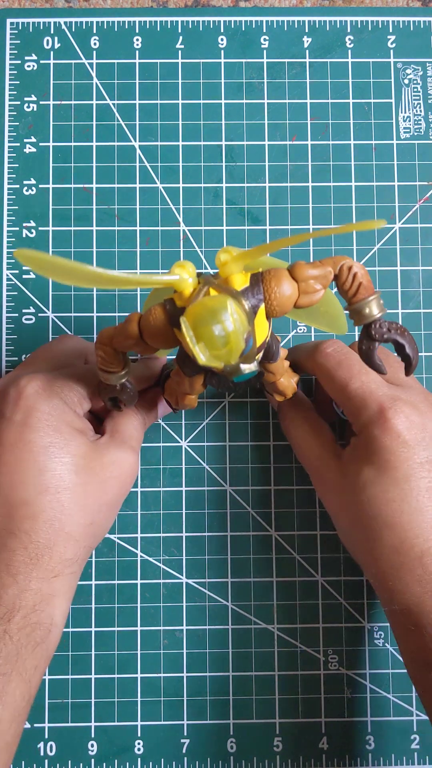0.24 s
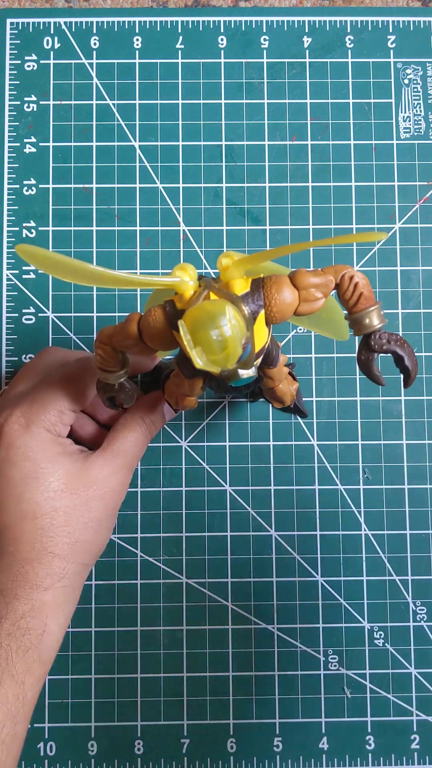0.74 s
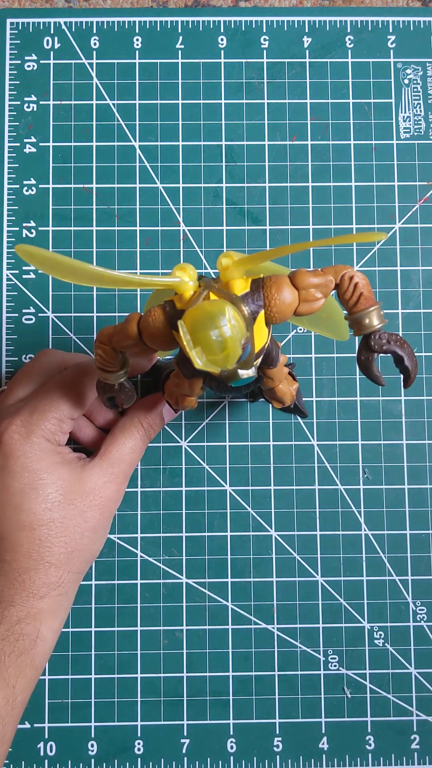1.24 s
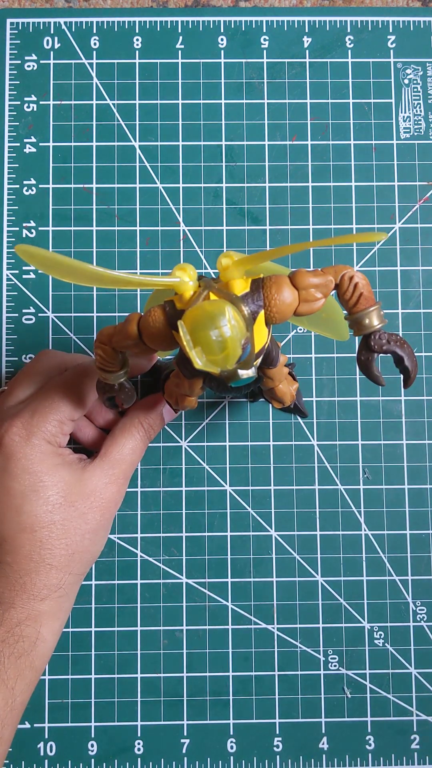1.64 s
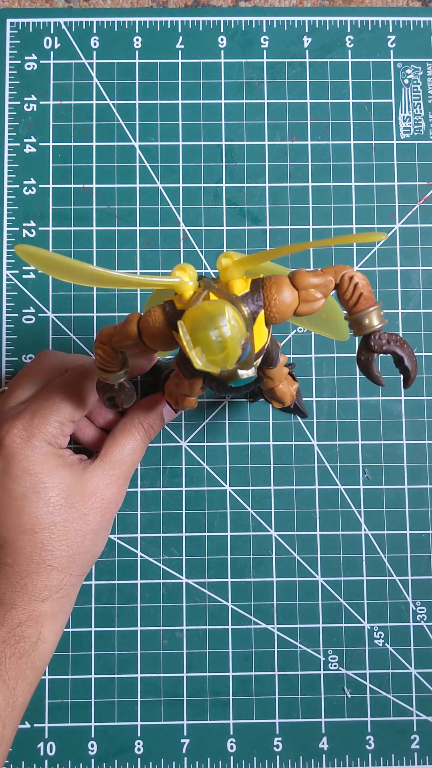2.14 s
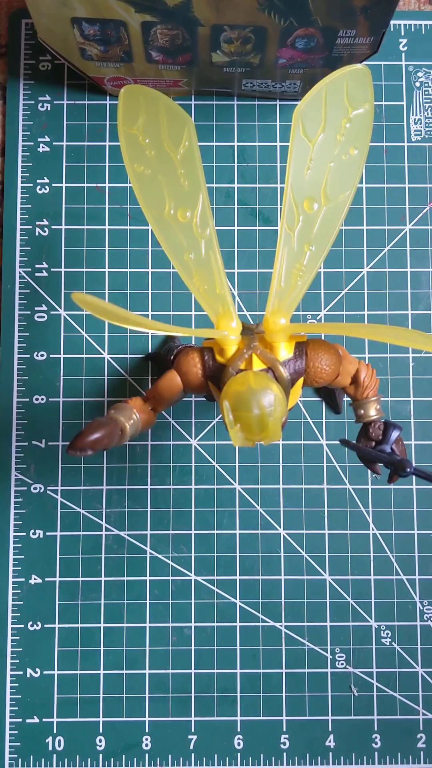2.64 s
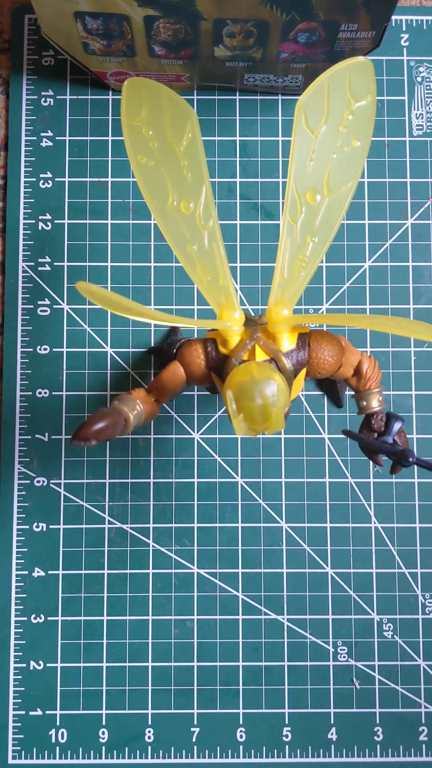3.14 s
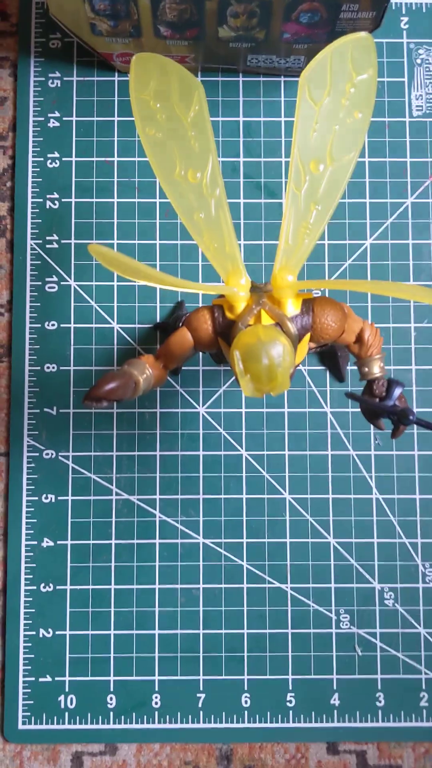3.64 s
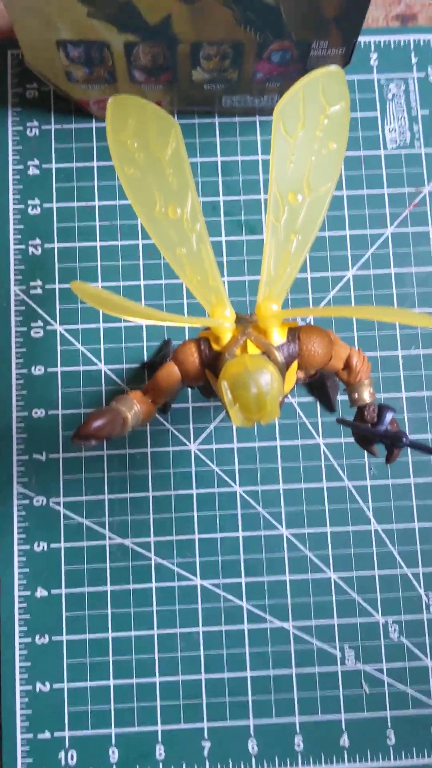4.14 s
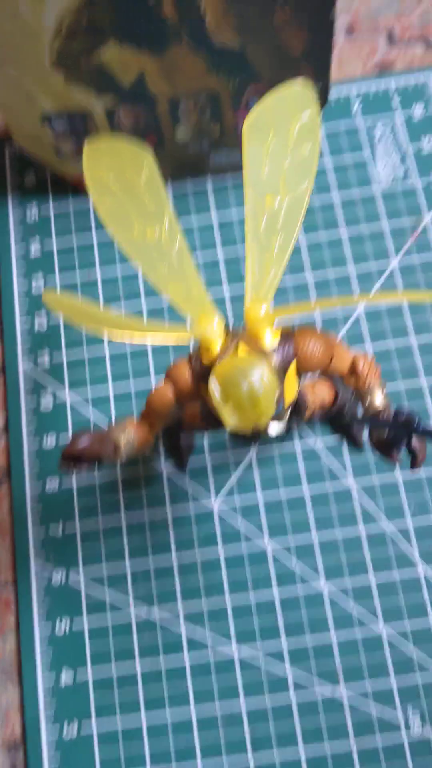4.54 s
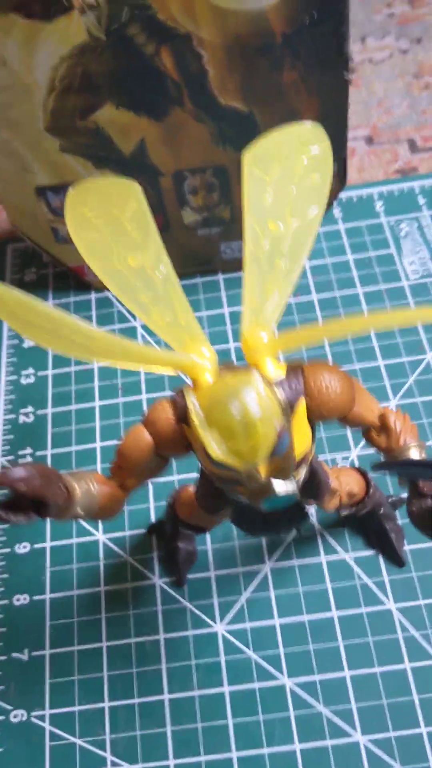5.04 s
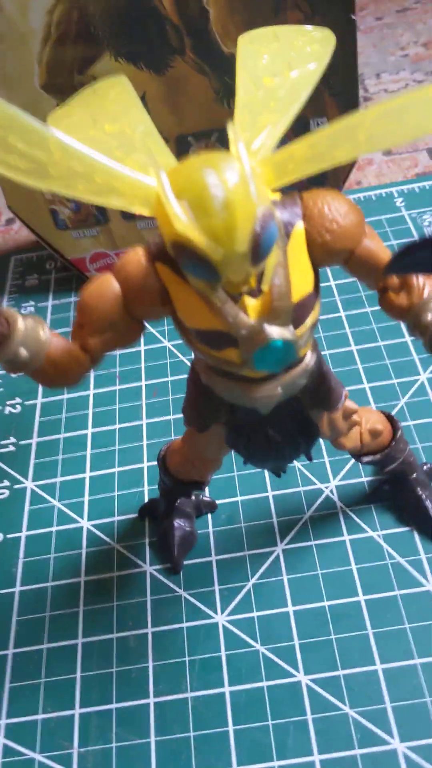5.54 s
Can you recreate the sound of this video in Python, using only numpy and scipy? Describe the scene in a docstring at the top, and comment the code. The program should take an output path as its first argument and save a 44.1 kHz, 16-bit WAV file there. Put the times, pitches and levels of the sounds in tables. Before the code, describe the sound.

In a small quiet room, a plastic figure is handled very close to a phone microphone. Faint joint ticks and soft rubbing come first, then a pause. Plastic creaks and clicks thicken into a short squeaky scrape that climbs in pitch and ends in a loud snap with a thin metallic ring. Only quiet room rumble and slight rubbing follow.

```python
"""A plastic spring clamp creaks, scrapes and snaps shut as a phone is worked out of it in a quiet room.
Each creak is one slip of the grip: a damped resonance plus a bright crack. Crowded slips make a rising scrape.
The snap is a noise burst with a ringing spring; pressure steps thump into the phone's left port.
Before and among the creaks, a plastic figure's joints tick faintly as short filtered clicks.
Skin rubs in grainy noise, a closing hand adds hollow noise, and room air rumbles and hums throughout."""
import sys
import numpy as np
from scipy import signal
from scipy.fft import rfft, irfft
from scipy.io import wavfile

SR = 44100
rng = np.random.default_rng(int(sys.argv[2]) if len(sys.argv) > 2 else 0)


def materialize(psi):
    """Save the field psi as 16-bit PCM at rate SR to the path in sys.argv[1].

    A 1-D psi becomes a single channel; in a 2-D psi each row is a channel.
    """
    bounded = np.clip(np.atleast_2d(psi).T, -1, 1)
    quanta = np.round(bounded * 32767).astype(np.int16)
    wavfile.write(sys.argv[1], SR, quanta)


N = 255324
TIME = np.arange(N) / SR
HIT_SIZE = 2048  # samples in one short hit
HIT_HZ = np.maximum(np.fft.rfftfreq(HIT_SIZE, 1 / SR), 1)
SNAP_S = 4.3518  # the jaws snap shut and the phone comes free


def undb(db):
    """Decibels to gain."""
    return 10 ** (np.asarray(db) / 20)


def unit(x):
    """Scale to rms 1."""
    return x / np.sqrt(np.mean(x ** 2))


def per_ms(x):
    """Scale a hit to the energy of one millisecond at rms 1."""
    return x * np.sqrt(SR / 1000 / np.sum(x ** 2))


def colour(points, hz):
    """Gain of a (freq_hz, level_db) spectrum, interpolated along log frequency."""
    point_hz, point_db = np.transpose(points)
    return undb(np.interp(np.log(np.maximum(hz, 1)), np.log(point_hz), point_db))


def tint(x, points):
    """Filter a signal with a (freq_hz, level_db) spectrum."""
    gain = colour(points, np.fft.rfftfreq(len(x), 1 / SR))
    return irfft(rfft(x) * gain, len(x))


def causal(gain):
    """Minimum-phase impulse response with this gain over HIT_HZ: its energy comes as early as possible."""
    cepstrum = irfft(np.log(gain + 1e-6))
    # fold the second half onto the first so that nothing precedes the hit
    cepstrum[1:HIT_SIZE // 2] *= 2
    cepstrum[HIT_SIZE // 2 + 1:] = 0
    return irfft(np.exp(rfft(cepstrum)))


def ripple(db, size=14):
    """Random peaks and dips: every contact point excites the plastic differently."""
    noise = rng.standard_normal(len(HIT_HZ))
    smooth = signal.convolve(noise, np.hanning(2 * size), "same")
    return undb(db * unit(smooth))


def walk(points_per_s):
    """Random drift at rms 1, in straight lines between random points."""
    count = int(N / SR * points_per_s) + 2
    points = rng.standard_normal(count)
    return unit(np.interp(TIME * points_per_s, np.arange(count), points))


def fade(t60_s):
    """Exponential decay that loses 60 dB in t60_s."""
    return np.exp(-np.log(1000) * TIME / t60_s)


def ring(modes):
    """Sum of decaying sine modes given as (freq_hz, t60_s, level_db)."""
    return sum(undb(db) * fade(t60) * np.sin(2 * np.pi * hz * TIME) for hz, t60, db in modes)


def tail(t60_s):
    """Half a second of dense decaying reflections with unit energy."""
    x = fade(t60_s)[:SR // 2] * rng.standard_normal(SR // 2)
    return x / np.sqrt(np.sum(x ** 2))


def through(x, response):
    """Pass a signal through an impulse response."""
    return signal.fftconvolve(x, response)[:N]


def add(track, start_s, x):
    """Mix x into the track from start_s."""
    i = int(start_s * SR)
    track[i:i + len(x)] += x[:N - i]


# spectrum of the room air, later scaled to rms 1: freq_hz, level_db (relative, per Hz)
AIR_SPECTRUM = [(20, -1), (45, -4.5), (70, -2), (92, -6), (135, -1), (260, -13.5), (420, -15.5), (780, -11),
                (1150, -20.5), (2100, -21.5), (2500, -24.5), (4500, -30), (7000, -42), (12000, -41.5),
                (16000, -47.5)]
# low hum, relative to the air before a common lift: freq_hz (centre of a drifting tone), level_db
HUM_TONES = [(70, -65.5), (118.4, -63)]
AIR_LEFT_DB, AIR_RIGHT_DB = -46, -49  # before the common trim
DIP_LEFT_DB, DIP_RIGHT_DB, DIP_S = -5.5, -1, 0.14  # deepest drop, and its delay after the snap


def air(shared_hz=650, hum_db=50, lag_radians=0.49):
    """Room rumble and a low hum: the bass is common to both ports, shifted in phase; the hiss is not."""
    hz = np.fft.rfftfreq(N, 1 / SR)
    shared = 1 / (1 + (hz / shared_hz) ** 2)
    common = rfft(rng.standard_normal(N))
    hum = sum(undb(db + hum_db) * np.sqrt(2) * np.sin(2 * np.pi * f * TIME + .8 * walk(16))
              for f, db in HUM_TONES)
    left_colour = [(100, 0), (16000, 0.016)]
    right_colour = [(100, -4), (400, -1.5), (800, -4.5), (4400, -3.0), (8000, 0.0), (15000, 3.0)]
    # the level dips briefly after the snap
    since = np.maximum(TIME - SNAP_S, 0) / DIP_S
    dip = since * np.exp(1 - since)
    left_db = AIR_LEFT_DB + DIP_LEFT_DB * dip
    right_db = AIR_RIGHT_DB + DIP_RIGHT_DB * dip
    ports = []
    for port_colour, db in [(left_colour, left_db), (right_colour, right_db)]:
        own = rfft(rng.standard_normal(N))
        noise = irfft(np.sqrt(shared) * common + np.sqrt(1 - shared) * own, N)
        rumble = tint(unit(tint(noise, AIR_SPECTRUM)), port_colour)
        ports.append((rumble + hum) * undb(db - 3 + .5 * walk(7.8)))
    left, right = ports
    return np.array([left, irfft(rfft(right) * np.exp(-1j * lag_radians), N)])


# faint hollow tones under the clamp: freq_hz, width_hz (half-width of the resonance), level_db
HOLLOW_TONES = [(1404, 81, -65.5), (1763, 56, -72), (2100, 88, -67.5)]


def hollow_air():
    """The gap under the clamp colours the air at the left port until the phone comes free."""
    hz = np.fft.rfftfreq(N, 1 / SR)
    noise = rfft(rng.standard_normal(N))
    tones = sum(undb(db) * unit(irfft(noise / (1 + ((hz - f) / width) ** 2), N))
                for f, width, db in HOLLOW_TONES)
    return tones * (TIME < SNAP_S)


STROKE_ATTACK_S, STROKE_RELEASE_DB_PER_S = 0.0053, 220


def stroke(start_s, length_s, swell_db_per_s):
    """Gain of one stroke of noise: a quick attack, a steady swell or sag, a release."""
    age = TIME - start_s
    swell_db = swell_db_per_s * np.clip(age, 0, length_s)
    release_db = STROKE_RELEASE_DB_PER_S * np.maximum(age - length_s, 0)
    return np.clip(age / STROKE_ATTACK_S, 0, 1) * undb(swell_db - release_db)


# rubbing strokes and, at 2.826 s, one abrupt short burst of noise; levels before swell and flutter:
# start_s, length_s, left_db, right_db, swell_db_per_s
NOISE_STROKES = [(.2, 0.75, -56.5, -59.5, -10.5), (2.826, 0.017, -45, -73, -140), (2.87, .19, -59, -77, 42),
                 (3.17, .25, -54, -70, 17), (3.47, 0.1, -56, -78, -10), (3.618, 0.035, -42.5, -64, -140),
                 (3.72, 0.16, -46, -68, -2), (3.97, .3, -52, -73, 48.5), (4.4, .53, -63, -67, 0),
                 (5.0, 0.52, -74, -68, 4), (5.6, 0.23, -74, -65.5, 48)]
# spectrum of the rubbing and the burst, later scaled to rms 1: freq_hz, level_db (relative)
RUB_SPECTRUM = [(100, -12), (600, -2), (1400, 1), (2000, 1.5), (3800, 0), (5500, -4), (7500, -12.5),
                (12000, -17.5), (16000, -25)]


def rubbing(grain_db=3.5, largest=6.1, flutter_db=1.2):
    """Skin drags over plastic in a haze of tiny uneven grains; one abrupt burst shares this noise."""
    flutter = undb(flutter_db * walk(41))
    gains = sum(undb([[left_db], [right_db]]) * stroke(start_s, length_s, swell)
                for start_s, length_s, left_db, right_db, swell in NOISE_STROKES)
    grain_size = np.minimum(rng.exponential(size=(2, N)), largest)
    grains = rng.standard_normal((2, N)) * undb(grain_db * grain_size)
    left, right = (unit(tint(g, RUB_SPECTRUM)) * gain * flutter for g, gain in zip(grains, gains))
    right_colour = [(1000, 2), (3000, -1.5), (4300, 2.5), (6000, -3.5), (12000, 11)]
    return np.array([left, tint(right, right_colour)])


# joint ticks, levels before the trims of joints(): start_s, body_db, treble_db
JOINT_TICKS = [(0.2219, -36.5, -32.5), (0.2539, -34, -35), (0.2689, -33.5, -33.5), (0.2989, -33.5, -34),
               (0.4912, -46, -47), (0.507, -33, -40), (0.523, -41, -41), (0.539, -44.5, -43),
               (0.561, -49, -47), (3.0999, -39, -29), (3.106, -36, -47), (3.123, -33.5, -68),
               (3.152, -48, -30.5), (3.179, -35, -36)]


def joints(body_trim_db=3, top_trim_db=1, rattle_db=-6):
    """Stiff joints tick: the left port gets the body of each tick, the right its thin top."""
    body_colour = [(200, -29), (650, -2.5), (950, 1.0), (3500, -0.5), (4200, -2.5), (5000, -3.5),
                   (7000, -10), (10000, -9.5), (15000, -20)]
    top_colour = [(300, -16), (750, -14), (1100, 3.5), (1600, -11), (7000, -6.5), (10000, -3.5),
                  (13000, 1), (16000, -4.0)]
    out = np.zeros((2, N))
    for start_s, body_db, treble_db in JOINT_TICKS:
        body = per_ms(causal(colour(body_colour, HIT_HZ) * ripple(1.5)))
        top = per_ms(causal(colour(top_colour, HIT_HZ) * ripple(3.8)))
        add(out[0], start_s, undb(body_db + body_trim_db) * body)
        add(out[1], start_s, undb(treble_db + top_trim_db) * top)
    # the hollow limbs rattle for a few milliseconds
    return np.array([x + undb(rattle_db) * through(x, tail(0.013)) for x in out])


# path through the phone's case: freq_hz, level_db (relative)
CASE_PATH = [(100, -1.5), (300, -1), (500, 1.5), (900, -0.5), (1400, 2.5), (1900, -8), (2600, -2),
             (3600, 2), (4600, 1), (5800, -9), (7300, -10), (9500, -12.5), (16000, -28.5)]


def contact(hz, sharpness, crack_db, crack_hz=3000, ripple_db=3.5, softness=3.7):
    """One contact: a heavily damped resonance and a bright crack, heard through the case."""
    peak = 1 / (1 + (sharpness * (HIT_HZ / hz - hz / HIT_HZ)) ** 2)
    # a soft contact loses treble above softness * hz
    resonance = peak / (1 + (HIT_HZ / hz / softness) ** 2)
    crack = undb(crack_db) ** 2 / (1 + (crack_hz / HIT_HZ) ** 2)
    gain = np.sqrt(resonance + crack) * colour(CASE_PATH, HIT_HZ)
    return per_ms(causal(gain * ripple(ripple_db)))


# single slips of the grip, then two faint high ticks after the snap:
# start_s, level_db (both before a small offset), resonance_hz, crack_db (relative to the resonance)
SLIPS_AND_TICKS = [(2.498, -15, 2890, -10), (2.5041, -25, 2490, -14), (2.5124, -13.5, 3130, -8),
                   (3.0275, -24.5, 1230, -30), (3.0333, -8, 3230, -4.5), (3.0485, -21.5, 2700, -10),
                   (3.1736, -19.5, 2450, -3), (3.2113, -18, 3110, -12), (3.2277, -17, 3880, -12),
                   (3.2382, -7, 3610, -20), (3.268, -14, 1300, -16), (3.27, -12, 2830, -8),
                   (3.3071, -13, 4330, -13), (3.3151, -22.5, 590, -3.5), (3.318, -21, 2400, -27),
                   (3.3247, -16.5, 2590, -10), (3.3493, -20, 2790, -12), (3.3613, -25, 1140, -24),
                   (3.3944, -17.5, 3640, -23), (3.4328, -30.5, 1430, -21), (3.5108, -11.5, 2160, -30),
                   (3.5266, -20.5, 744, -39), (3.5476, -30.5, 640, -16), (3.5559, -29.5, 5610, 2),
                   (3.575, -15.5, 1540, -39), (3.586, -27, 1240, -33), (3.6172, -13, 750, -16),
                   (3.629, -23, 546, -26), (3.6559, -29, 537, -34), (3.6698, -28, 3530, -25),
                   (3.718, -13.5, 690, -14.5), (3.7211, -16, 1720, -25), (3.7778, -20.5, 1710, -24),
                   (3.797, -16, 674, -24.5), (3.863, -24, 700, -29), (3.8668, -18, 1730, -11),
                   (3.9031, -26, 1070, -18), (3.9691, -12, 860, -15), (4.0065, -13.5, 800, -16),
                   (4.0328, -21, 646, -14.5), (4.052, -29, 4840, -30), (4.0807, -13.5, 800, -13),
                   (4.1004, -20.5, 660, -14.5), (4.1196, -21.5, 6965, -10.5), (4.1303, -16.5, 690, -14),
                   (4.1562, -15, 4800, -4.5), (4.2127, -22.5, 690, -14), (4.219, -23, 3350, -14),
                   (4.2425, -22.5, 685, -10.5), (4.2528, -18.5, 2070, 0), (4.5085, -39, 3880, -7),
                   (4.619, -44.5, 5210, -15)]
# how sharply each one rings at its resonance: resonance_hz, q (no unit)
CONTACT_SHARPNESS = [(700, 1.48), (1100, 0.99), (1600, 2.8), (2400, 1.1), (3600, 1.2), (6000, 1.8)]


def creaks():
    """The rubber grip sticks and lets go, slip by slip; two faint high ticks follow the snap."""
    out = np.zeros(N)
    for start_s, db, hz, crack_db in SLIPS_AND_TICKS:
        sharpness = np.interp(hz, *np.transpose(CONTACT_SHARPNESS))
        add(out, start_s - .0003, undb(db - 0.5) * contact(hz, sharpness, crack_db))
    return out


def squeak(hz, cycles=1.6):
    """The rubber chatters for a few cycles: a tone that swells and dies at once."""
    phase = hz * TIME[:HIT_SIZE]  # in cycles
    envelope = (phase / cycles) ** 2 * np.exp(-2 * phase / cycles)
    return per_ms(envelope * np.sin(2 * np.pi * phase))


# the slide swells to full force, holds until the jaws snap, then stops abruptly
SLIDE_START_S, SLIDE_FULL_S, SLIDE_DB = 4.225, 4.317, -11  # level before the trims of slide()
SWELL_DB_PER_S, STOP_DB_PER_S = 476.5, 2199.5
# its pitch climbs ever faster from the low grip note as the jaw nears the edge
GRIP_HZ, EDGE_HZ, CLIMB_S = 994, 3530, 0.018  # CLIMB_S is the time constant


def slide(count=88, scatter_db=2.0, detune_share=0.41, squeak_db=-1, crack_db=-2.5, knock_db=-9.0, hiss_db=-13):
    """Slips run together into a squeaky scrape that sharpens near the edge; the rubber hisses along."""
    swell_db = SWELL_DB_PER_S * np.maximum(SLIDE_FULL_S - TIME, 0)
    stop_db = STOP_DB_PER_S * np.maximum(TIME - SNAP_S, 0)
    db = SLIDE_DB - swell_db - stop_db
    hz = GRIP_HZ + (EDGE_HZ - GRIP_HZ) * np.exp(np.minimum(TIME - SNAP_S, 0) / CLIMB_S)
    start, end = SLIDE_START_S, SNAP_S + .02
    out = np.zeros(N)
    for k, (late, size, detune, side) in enumerate(rng.uniform(-1, 1, (count, 4))):
        s = start + (end - start) * (k + late / 2) / count
        i = int(s * SR)
        pitch = hz[i] * np.exp(detune_share * detune)
        slip = undb(squeak_db) * squeak(pitch)
        slip = slip + undb(crack_db) * contact(pitch, 1.5, -24.0)
        slip = slip + undb(knock_db) * contact(650, 0.73, -31)
        add(out, s, np.sign(side) * undb(db[i] + scatter_db * size) * slip)
    hiss_colour = [(500, -13), (2500, -1.5), (5000, 2.0), (7000, -9.0), (16000, -20.0)]
    hiss = unit(tint(rng.standard_normal(N), hiss_colour))
    # the hiss grows more slowly than the slips
    return out + hiss * undb(0.5 * db + hiss_db) * (TIME > start) * (TIME < end)


# modes of clamp and case, before a common trim: freq_hz, t60_s, level_db
CLAMP_MODES = [(1319, 0.062, -41), (1767, 0.066, -49), (2080, .06, -43), (2450, .06, -46.5),
               (3080, 0.08, -47.5), (3515, 0.047, -40.5), (4030, 0.089, -50), (4460, 0.13, -47.5)]


def clamp_body(grip):
    """Every contact rings the modes of clamp and case and scatters briefly inside the plastic."""
    modes = undb(-9) * through(grip, ring(CLAMP_MODES)[:SR // 4])
    scatter = tint(through(grip, tail(0.025)), [(700, -11.5), (2200, -9.5)])
    return grip + modes + scatter


def bend(x, corner_hz=3000, order=6):
    """Bending waves in a thin plate: the treble runs ahead, which spreads each click a little."""
    g = np.tan(np.pi * corner_hz / SR)
    a = (g - 1) / (g + 1)
    for _ in range(order):
        x = signal.lfilter([a, 1], [1, a], x)  # all-pass
    return x


# spectrum of the clap: freq_hz, level_db (relative)
SNAP_SPECTRUM = [(100, -25), (500, -3.5), (1500, -5.5), (4200, 3), (7000, -6), (11000, -3.5), (16000, -7.5)]
# the clamp's spring, levels before each port's trim: freq_hz, t60_s, level_db
SPRING_MODES = [(7700, 1.7, -61.5), (7950, .5, -58.5), (8170, .4, -58.5), (8387, 0.68, -54)]
SNAP_DB = -9  # before each port's clap and chatter trims


def snap():
    """The jaws clap shut in front of both ports, chatter briefly and leave the spring ringing."""
    out = np.zeros((2, N))
    # left, then right: clap_db, chatter_db, spring_db
    for port, (clap_db, chatter_db, spring_db) in zip(out, [(1, 6.0, 2.5), (4, 0.5, -12.0)]):
        blow = undb(clap_db) * tail(0.033) + undb(chatter_db) * tail(0.1)
        clap = signal.fftconvolve(blow, per_ms(causal(colour(SNAP_SPECTRUM, HIT_HZ))))
        add(port, SNAP_S, undb(SNAP_DB) * clap)
        add(port, SNAP_S, undb(spring_db) * ring(SPRING_MODES))
    return out


# pressure steps at the left port: start_s, size_db, sign (direction),
# decay_s (time constant), swing_hz, edge_hz (low-pass corner)
PORT_THUMPS = [(4.355, -10, 1, 0.022, 16, 397), (4.452, -28.5, 1, 0.03, 2.3, 40.1),
               (4.933, -24, -1, 0.014, 13, 3000)]


def thumps():
    """Fingers press air into the left port; the pressure leaks away with a slow swing."""
    out = np.zeros(N)
    for start_s, db, sign, decay_s, swing_hz, edge_hz in PORT_THUMPS:
        swing = np.exp(-TIME / decay_s) * np.cos(2 * np.pi * swing_hz * TIME + 0.74)
        step = np.sign(sign) * undb(db) * swing
        add(out, start_s, signal.lfilter(*signal.butter(1, edge_hz, fs=SR), step))
        # the sharper the touch, the brighter its tap on the case
        add(out, start_s, undb(db - 11.5) * contact(edge_hz / 3, 0.41, -25))
    return out * undb([[0], [-20]])  # left, right


def cupped_hand(start_s=5.24, end_db=-61):
    """The hand closes around the phone: its hollow colours skin noise that swells to the end."""
    hollow = [(800, -20), (1700, -16), (2150, 5), (2800, -23), (3600, -14), (4200, 5), (5200, -14), (16000, -16)]
    swell = np.clip((TIME - start_s) / (TIME[-1] - start_s), 0, 1)
    noise = np.array([unit(tint(x, hollow)) for x in rng.standard_normal((2, N))])
    return noise * swell * undb(end_db)


def room(x, t60_s=0.34, treble_share=0.74):
    """A small room's reflections; its treble dies first."""
    low_colour = [(100, -7.5), (700, -4.5), (3500, -1.0), (6000, -6), (9000, -13.5), (16000, -26.5)]
    high_colour = [(100, -31), (3000, -8), (7000, -5.5), (16000, -3.5)]
    low = tint(tail(t60_s), low_colour)
    high = tint(tail(t60_s * treble_share), high_colour)
    return through(x, low + high)


def scene():
    """The clamp sounds through the case into the left port; the right hears it mostly through the air."""
    grip = clamp_body(bend(creaks() + slide()))
    far_colour = [(100, -28), (700, -29.0), (3500, -27), (7000, -27), (14000, -15.5)]
    far_grip = tint(through(grip, tail(.012)), far_colour)
    ticks, clap = joints(), snap()
    left_room = room(undb(-20) * grip + undb(-9.5) * ticks[0] + undb(-17) * clap[0])
    left = grip + ticks[0] + clap[0] + hollow_air() + left_room
    right_room = room(undb(-30.0) * grip + undb(-18) * ticks[1] + undb(-11) * clap[1])
    right = far_grip + ticks[1] + clap[1] + right_room
    return np.array([left, right]) + thumps() + rubbing() + cupped_hand() + air()


def record(dry, ceiling=0.79, top_hz=16000):
    """The phone rounds the loudest peaks by soft saturation and cuts the top with a steep low-pass."""
    rounded = ceiling * np.tanh(dry / ceiling)
    return signal.sosfilt(signal.ellip(8, .2, 70, top_hz, fs=SR, output="sos"), rounded)


dry = scene()
out = record(dry)
materialize(out)
```